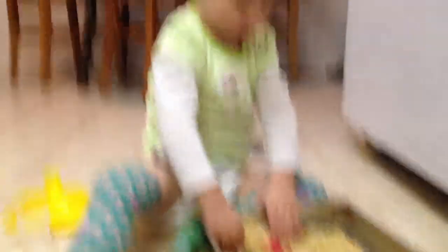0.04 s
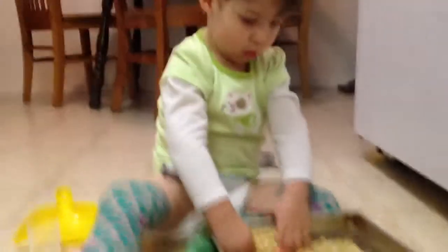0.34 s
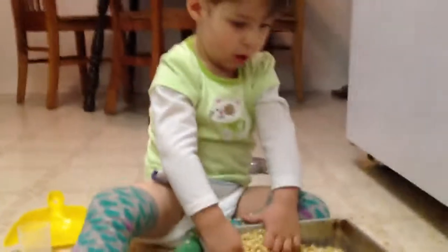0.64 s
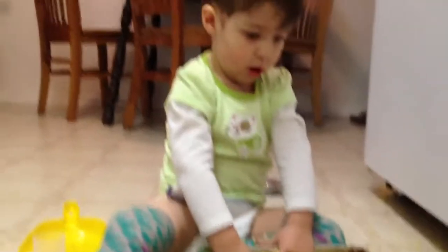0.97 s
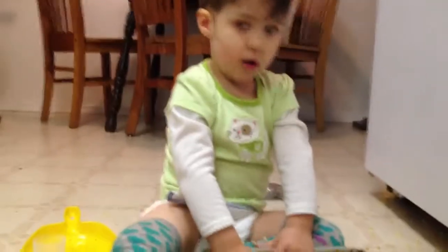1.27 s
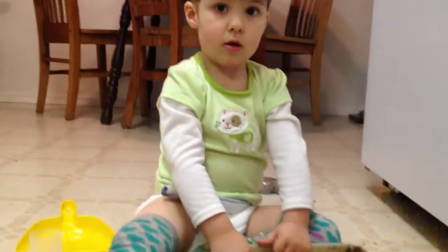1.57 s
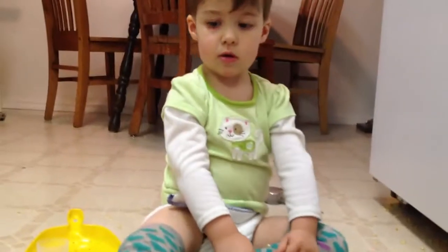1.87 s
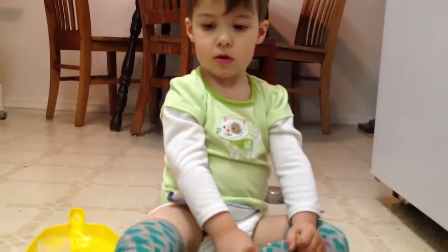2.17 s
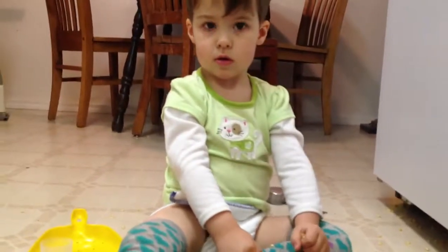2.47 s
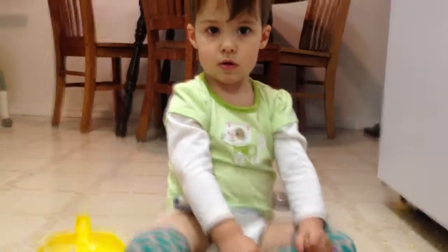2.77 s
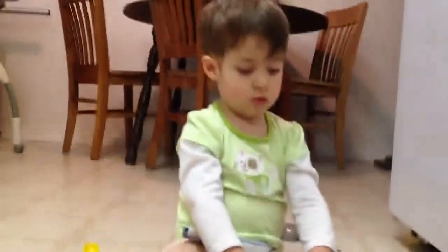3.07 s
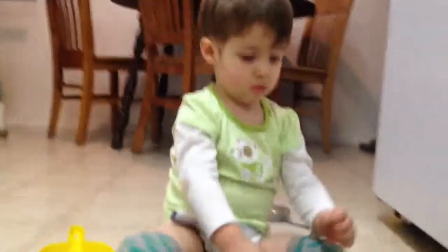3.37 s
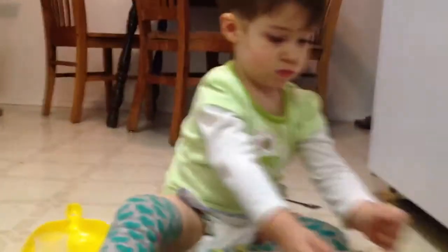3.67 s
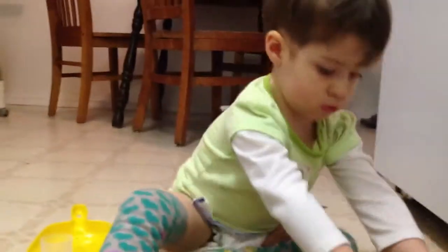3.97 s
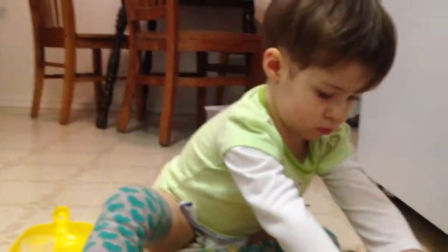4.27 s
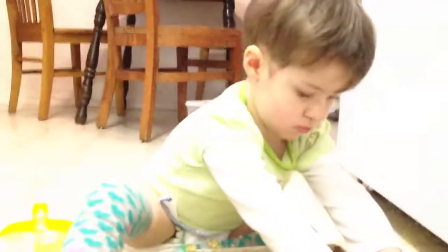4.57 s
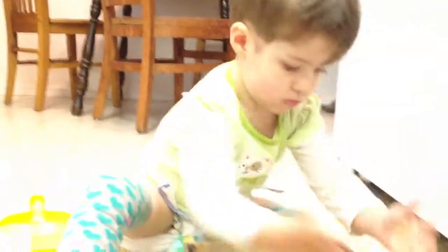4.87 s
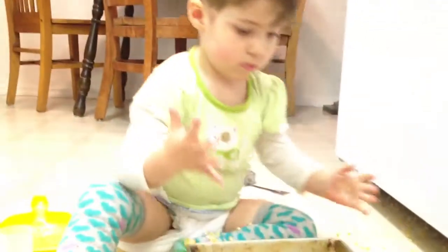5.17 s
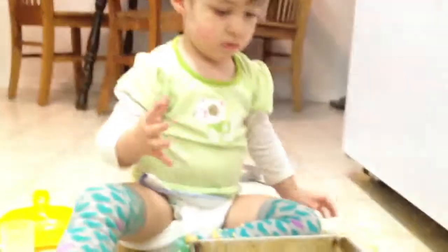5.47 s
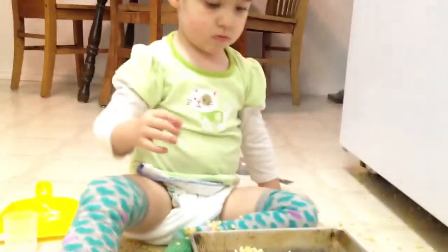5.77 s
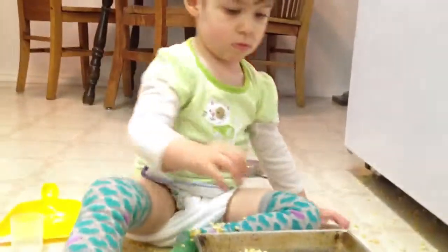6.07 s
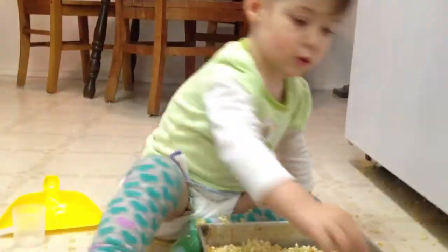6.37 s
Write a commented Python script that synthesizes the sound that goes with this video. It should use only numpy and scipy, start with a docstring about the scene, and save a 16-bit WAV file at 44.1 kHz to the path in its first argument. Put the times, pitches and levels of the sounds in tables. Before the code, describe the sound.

Dry kernels rattle and click in a metal baking pan, then pour back onto it after a lull, in a quiet kitchen.

```python
"""A metal baking tray on a kitchen floor, heard from close by through one small microphone.
An appliance chatters faintly in the hard-walled room throughout. For two seconds small hands stir dry
popcorn kernels: the pile rattles, the pushed pan booms softly, single kernels click on the sheet metal.
A lull follows, with a few dull bumps and scuffs. Near 3.8 s two fistfuls rain back in for about a
second, and a few more kernels shift and click up to the end."""
import sys
import numpy as np
from scipy import signal
from scipy.fft import rfft, irfft
from scipy.io import wavfile
from scipy.ndimage import uniform_filter1d

SR = 44100
rng = np.random.default_rng(int(sys.argv[2]) if len(sys.argv) > 2 else 0)


def waveform_to_disk(signal):
    """Save audio, clipped to [-1, 1], as 16-bit WAV at the path in sys.argv[1]."""
    frames = np.transpose(np.atleast_2d(signal))
    scaled = np.clip(frames, -1, 1) * 32767
    samples = np.round(scaled).astype(np.int16)
    wavfile.write(sys.argv[1], SR, samples)


N = 287973
TIME = np.arange(N) / SR
FREQ_HZ = np.fft.rfftfreq(N, 1 / SR)


def amp(db):
    """Decibels to gain."""
    return 10 ** (np.asarray(db) / 20)


def unit_rms(x):
    """Scales to an rms of one."""
    return x / np.sqrt(np.mean(x ** 2) + 1e-20)


def curve_at(points, hz):
    """Reads a table along a log-frequency axis."""
    freq_hz, value = np.transpose(points)
    return np.interp(np.log(hz + 1), np.log(freq_hz + 1), value)


def add(mix, start_s, sound):
    """Mixes a sound in at start_s."""
    part = mix[max(round(start_s * SR), 0):][:len(sound)]
    part += sound[:len(part)]


def colour(x, spectrum, size=2048):
    """Causal filter with the given spectrum, so that attacks stay sharp."""
    log_gain = np.log(amp(curve_at(spectrum, abs(np.fft.fftfreq(size, 1 / SR)))))
    taps = np.fft.ifft(np.exp(np.conj(signal.hilbert(log_gain)))).real
    return signal.fftconvolve(x, taps[:size // 2])[:len(x)]


def blend(x, ring_db, fizz_db):
    """Balances the pan's low ring and the husks' high fizz against the kernels' clack, at rms one."""
    hz, spectrum = np.fft.rfftfreq(len(x), 1 / SR), rfft(x)
    low = 1 / (1 + (hz / 3200) ** 10)
    high = 1 - 1 / (1 + (hz / 10000) ** 20)
    ring, clack, fizz = (unit_rms(irfft(spectrum * band, len(x))) for band in (low, 1 - low - high, high))
    return clack + amp(ring_db) * ring + amp(fizz_db) * fizz


def contact(t60_s, rise_s=.0008, size=3072):
    """One hard contact: a crowd of heavily damped modes, made as decaying noise, and its envelope."""
    t = np.arange(size) / SR
    envelope = (1 - np.exp(-t / rise_s)) * amp(-60 * t / t60_s)
    return envelope * rng.standard_normal(size), envelope / envelope.max()


# Room tone of the kitchen: freq_hz, relative_db
ROOM_SPECTRUM = [(30, -21), (70, -11), (130, -1.5), (230, 0), (400, -5.5), (800, -10.5), (1300, -11.5),
                 (3200, -18.5), (7500, -16.5), (10000, -27.5), (14000, -17), (15500, -27.5)]


def room_tone(level_db=-66.33):
    """Steady rumble and hiss all round the microphone."""
    spectrum = rfft(rng.standard_normal(N)) * amp(curve_at(ROOM_SPECTRUM, FREQ_HZ))
    return amp(level_db) * unit_rms(irfft(spectrum, N))


# Resonances of the appliance's loose panel, in the background: pitch_hz, width_hz, relative_db
PANEL_MODES = [(1950, 200, -5), (2230, 260, -1), (2630, 140, -6), (3950, 900, -12), (5850, 220, 1),
               (7200, 1800, -13)]
# Its slightly unsteady pace, about 14 beats a second: time_s, beat_count
PANEL_BEATS = [(0, 0), (2.392, 34), (3.245, 46), (3.62, 51), (5.61, 78), (6.11, 85), (6.54, 91)]


def appliance(level_db=-62, weak_db=-2.5):
    """A shaking motor makes a loose panel chatter twice a turn, strong then weak."""
    beat, phase = np.divmod(np.interp(TIME, *np.transpose(PANEL_BEATS)), 1)
    strength = amp(weak_db * (beat % 2) + rng.standard_normal(128)[beat.astype(int)])
    envelope = .1 + strength * np.minimum(phase / .1, 1) * amp(-14 * phase)
    power = sum(amp(db) ** 2 / (1 + (2 * (FREQ_HZ - hz) / width) ** 2) for hz, width, db in PANEL_MODES)
    chatter = irfft(rfft(envelope * rng.standard_normal(N)) * np.sqrt(power), N)
    return amp(level_db) * unit_rms(chatter)


def rattle(levels, spectrum, per_s, spread_db, clump_db, t60_s=.016, grain_count=80):
    """A clumpy hail of kernel contacts, mostly small. Rows of levels: time_s, clack_db, ring_db, fizz_db."""
    time_s, *columns = np.transpose(levels)
    t = TIME[(TIME >= time_s[0]) & (TIME <= time_s[-1])]
    clack_db, ring_db, fizz_db = (np.interp(t, time_s, column) for column in columns)
    chance, size, kind = rng.random((3, N))[:, :len(t)]
    clumps = unit_rms(uniform_filter1d(rng.standard_normal(N), size=500))[:len(t)]  # the pile gives way
    hit_db = spread_db * np.minimum(-np.log(size + 1e-9), 4) + clump_db * clumps
    hits = (chance < per_s / SR) * amp(hit_db)
    hits /= np.sqrt(abs(uniform_filter1d(hits ** 2, size=3000)) + 1e-4)  # evens out slow swings
    grains, out = np.zeros(len(t)), np.zeros(N)
    for k in range(grain_count):
        own_hits = hits * ((kind * grain_count).astype(int) == k)
        grains += signal.oaconvolve(own_hits, unit_rms(contact(t60_s)[0]))[:len(t)]
    sound = amp(clack_db) * blend(colour(grains, spectrum), ring_db - clack_db, fizz_db - clack_db)
    add(out, time_s[0], sound * signal.windows.tukey(len(t), min(300 / len(t), 1)))
    return out


# Band in which the bare bottom of the pan rings: low_hz, high_hz
BOTTOM_BAND = [1930, 2420]


def pan_bottom(drive):
    """The broad ring of the pan's bottom, as strong as the rattle that drives it."""
    band = signal.butter(2, BOTTOM_BAND, "bandpass", fs=SR, output="sos")
    return np.std(drive) * unit_rms(signal.sosfilt(band, drive))


# Hands through the pile, the last strokes scooping two fistfuls: start_s, end_s, clack_db, ring_db, fizz_db
HAND_STROKES = [(0, 0.059, -27, -35, -31), (0.14, .18, -33.5, -38, -40), (0.26, 0.428, -31.5, -38, -37.5),
                (0.586, 0.835, -35, -41.5, -43), (0.893, 0.972, -46, -48.5, -60),
                (1.03, 1.193, -43, -46.5, -48), (1.34, 1.44, -44.5, -51, -56),
                (1.517, 1.547, -34.5, -42.5, -36.5), (1.637, 1.928, -32, -43, -34.5)]


def stir_levels(rise_db_per_s=123, fall_db_per_s=147, fizz_haste=2.1, stop_s=2.14):
    """Level rows for the rattle: each stroke builds up, holds and dies away, the fizz fastest."""
    t, power = np.linspace(0, stop_s, 215), 0
    for start_s, end_s, *held_db in HAND_STROKES:
        drop_db = np.maximum(rise_db_per_s * (start_s - t), fall_db_per_s * (t - end_s)).clip(min=0)
        power = power + amp(np.array(held_db) - np.outer(drop_db, [1, 1, fizz_haste])) ** 2
    return np.column_stack([t, 10 * np.log10(power + 1e-12)])


# Kernel on kernel, close up: freq_hz, relative_db
PILE_SPECTRUM = [(60, -36), (250, -25.5), (700, -28), (1200, -17), (1700, -13.5), (2200, -7.5),
                 (2750, -12.5), (3200, -7.5), (4100, 1.5), (5600, 4), (7300, 8), (9000, 3), (11000, -6.5),
                 (15000, -9)]
# Ring from kernels dragged over the bare bottom: time_s, relative_db
BOTTOM_DRAG = [(0, -14), (.17, 0.5), (.25, -30), (.75, -46), (1.15, -6), (1.5, -11), (2.1, -15)]


def stir(gain_db=-1, drag_db=-9.5, waver_db=3):
    """Stirring grinds many kernels together and rings the pan's bottom; that ring comes and goes."""
    grind = rattle(stir_levels(), PILE_SPECTRUM, per_s=3400, spread_db=3.0, clump_db=1.52)
    waver = unit_rms(uniform_filter1d(rng.standard_normal(N), size=1800))
    bottom_db = np.interp(TIME, *np.transpose(BOTTOM_DRAG)) + waver_db * waver + drag_db
    return amp(gain_db) * (grind + amp(bottom_db) * pan_bottom(grind))


def finger_crackle(per_s=100, gain_db=7, spread_db=6, highpass_hz=6000, cap_db=-38):
    """Kernels pinched between the fingers slip with tiny bright ticks, clearest in light handling."""
    time_s, push_db = stir_levels().T[:2]
    chance, size = rng.random(N), rng.standard_normal(N)
    tick_db = np.minimum(np.interp(TIME, time_s, push_db), cap_db) + gain_db + spread_db * size
    out = np.zeros(N)
    for i in np.flatnonzero((chance < per_s / SR) & (TIME < time_s[-1])):
        add(out, TIME[i], amp(tick_db[i]) * contact(t60_s=.0078, rise_s=.00013)[0])
    return signal.sosfilt(signal.butter(3, highpass_hz, "highpass", fs=SR, output="sos"), out)


# Low modes of the loaded pan on the floor: pitch_hz, relative_db, t60_s
PAN_MODES = [(95, -22, 0.32), (151.6, -5, 0.22), (211.7, -8, 0.18), (283, -6.5, .08), (416, -5.5, 0.12),
             (465, -2, 0.059), (551, -5, 0.082), (835, -9.5, .2)]
# Pushes and blows that flex it: start_s, relative_db
PAN_PUSHES = [(0.074, -38), (0.168, -35.5), (0.273, -35), (0.329, -37), (0.384, -41), (3.809, -41),
              (3.853, -46), (4.023, -48)]


def pan_boom(gain_db=-8, rise_s=.0022):
    """The pan flexes in its low modes, in a mix that depends on where the metal is touched."""
    out, t = np.zeros(N), np.arange(SR // 2) / SR
    modes = [amp(db - 60 * t / t60_s) * np.sin(2 * np.pi * hz * t) for hz, db, t60_s in PAN_MODES]
    attack = 1 - np.exp(-t / rise_s)
    for start_s, db in PAN_PUSHES:
        weights = rng.uniform(0.52, 1.32, len(modes)) * rng.choice([-1, 1], len(modes))
        add(out, start_s, amp(db + gain_db) * attack * (weights @ modes))
    return out


# Dull bumps and scuffs, faint at the microphone: start_s, level_db, pitch_hz, length_s
SOFT_CONTACTS = [(0.1, -43, 238, 0.0086), (.388, -46, 150, 0.023), (2.267, -56.5, 1360, 0.045),
                 (2.725, -50, 1150, 0.0044), (2.805, -54.5, 348, 0.018), (2.814, -53, 1310, 0.035),
                 (2.828, -43.5, 338, 0.015), (2.831, -48, 203, 0.021), (3.189, -52, 155, 0.018),
                 (3.806, -49.5, 258, 0.0055), (3.85, -49, 170, 0.011), (5.366, -54, 2410, 0.049),
                 (6.279, -50.5, 2180, 0.013), (6.385, -47.5, 3530, 0.027), (6.44, -53, 1300, 0.036)]


def bumps(band_ratio=1.47, size=4096):
    """Soft contacts without a ring: a short puff of noise round one pitch."""
    out, t = np.zeros(N), np.arange(size) / SR
    for start_s, db, hz, length_s in SOFT_CONTACTS:
        envelope = np.sin(np.pi * np.minimum(t / length_s, 1))
        band = signal.butter(3, [hz / band_ratio, hz * band_ratio], "bandpass", fs=SR, output="sos")
        puff = signal.sosfilt(band, envelope * rng.standard_normal(size))
        add(out, start_s, amp(db) * np.sqrt(np.mean(envelope ** 2)) * unit_rms(puff))
    return out


def strays(levels, per_s, over_db, ring_db=-18, fizz_db=-12, spread_db=2.5):
    """Strike rows for kernels that jump out of a moving pile at random, as strongly as it moves."""
    time_s, clack_db = levels.T[:2]
    gap, size, ring, fizz = rng.uniform(-1, 1, (40, 4)).T
    start_s = time_s[0] + np.cumsum(1 + gap) / per_s
    db = np.interp(start_s, time_s, clack_db) + over_db + spread_db * size
    rows = np.transpose([start_s, db, ring_db + 2 * spread_db * ring, fizz_db + 2 * spread_db * fizz])
    return list(rows[start_s < time_s[-1]])


# Kernel on sheet metal, close up: freq_hz, relative_db
STRIKE_SPECTRUM = [(60, -48), (250, -42), (650, -27.5), (1200, -12), (1700, -8), (2350, -3.5), (3100, -6.5),
                   (4200, 0.5), (5600, 2), (7300, 10.5), (9000, 1.5), (11000, -15), (14000, -10.5),
                   (15500, -18)]
# Kernels that strike clear of the rattle: start_s, relative_db, ring_share_db, fizz_share_db
KERNEL_STRIKES = [(.118, -12.5, -15, -19), (.133, -17, -22, -8), (0.2736, -10, -17.5, -9.5),
                  (0.5518, -17.5, -22, -26), (.647, -16.5, -26, -21), (.689, -14.5, -29, -15),
                  (.8876, -22, -31, -12), (1.0041, -14.5, -21, -15), (1.027, -17.5, -30, -6.5),
                  (1.039, -25, -20, -2), (1.0726, -20, -22, -11), (1.152, -19.5, -15, -15),
                  (1.192, -24, -10.5, -20), (1.258, -26, -16, -12), (1.312, -24.5, -17.5, -8),
                  (1.333, -18.5, -25, -13), (1.36, -24, -25, -3.5), (1.472, -25, -12, -7),
                  (1.525, -16, -25, -7), (1.766, -13.5, -23, -10.5), (1.782, -14, -24, -10),
                  (1.8115, -12.5, -20, -15), (1.86, -17.5, -17, -13), (1.983, -20, -17, -13),
                  (2.054, -23, -17, -31), (2.067, -28, -22, -10.5), (2.267, -35, -7, -20),
                  (2.891, -25.5, -28, -15.5), (3.108, -36.5, -13.5, -23), (3.655, -21, -15.5, -13),
                  (3.701, -27, -17, -14), (3.736, -24.5, -8.5, -16), (3.809, -4, -19, -8),
                  (3.814, -7, -17, -7), (3.855, -2, -18.5, -12.5), (3.898, -10, -16, -10),
                  (3.937, -13, -12, -11), (3.972, -5, -18.5, -11), (3.987, -17, -15, -12),
                  (4.0259, -9.5, -19, -8), (4.032, -8.5, -20, -11), (4.16, -19.5, -28, -1.5),
                  (4.2213, -14, -15.5, -8.5), (4.276, -20.5, -10, -15), (4.301, -21, -18, -14),
                  (4.336, -11.5, -22, -17), (4.341, -10.5, -18.5, -14), (4.351, -19, -20, -6),
                  (4.382, -18.5, -14, -7), (4.416, -17, -33, -12), (4.438, -16.5, -14, -15),
                  (4.462, -18.5, -25, -8), (4.494, -19.5, -8, -8.5), (4.54, -18.5, -10, -12),
                  (4.608, -17, -11.5, -13.5), (4.746, -19, -12, -18), (4.752, -23.5, -12, -13),
                  (4.7686, -24.5, -13, -20), (4.818, -34, -4, -27), (4.865, -34.5, -23, -20),
                  (5.129, -38, -16, -18), (5.149, -34, -16, -15), (5.2066, -44.5, -25, -11),
                  (5.389, -34.5, -26, -16), (5.398, -36.5, -24, -18), (5.441, -34.5, -24, -16),
                  (5.518, -31, -23, -8.5), (6.164, -33.5, -24, -12), (6.193, -36.5, -34, -2.5),
                  (6.311, -32, -13, -26), (6.445, -32.5, -8.5, -17), (6.4871, -20.5, -17.5, -16),
                  (6.501, -23, -13, -18), (6.505, -7.5, -18.5, -12.5), (6.52, -23, -10, -21)]


def kernel_clicks(gain_db=-10.5, ring_lift_db=8, fizz_lift_db=9):
    """Single kernels hit the pan or the floor, each ringing in its own way."""
    out = np.zeros(N)
    stirred = strays(stir_levels(), per_s=14, over_db=10)
    poured = strays(pour_levels(), per_s=15, over_db=6.5)
    for start_s, db, ring_db, fizz_db in KERNEL_STRIKES + stirred + poured:
        burst, envelope = contact(t60_s=.018, rise_s=.0016)
        click = blend(colour(burst, STRIKE_SPECTRUM), ring_db + ring_lift_db, fizz_db + fizz_lift_db)
        add(out, start_s, amp(db + gain_db) * np.sqrt(np.mean(envelope ** 2)) * click)
    return out


# A wash behind the clicks before the pour, then small shifts of kernels to the end:
# start_s, end_s, final_relative_db
FAINT_SWELLS = [(3.648, 3.77, -54.5), (4.642, 4.71, -39), (5.081, 5.17, -63), (5.32, 5.415, -53.5),
                (6.269, 6.53, -51)]


def faint_rattles(gain_db=-1.5, swell_db=17, ring_db=-2.5, fizz_db=-15, bottom_db=-7):
    """Each faint rattle swells to its end and rings the pan's bottom."""
    swells = np.zeros(N)
    for start_s, end_s, db in FAINT_SWELLS:
        final_db = db + np.array([0, ring_db, fizz_db])
        levels = [(start_s, *(final_db - swell_db)), (end_s, *final_db)]
        swells += rattle(levels, PILE_SPECTRUM, per_s=1700, spread_db=3.5, clump_db=0.5)
    return amp(gain_db) * (swells + amp(bottom_db) * pan_bottom(swells))


def pour_levels(start_s=3.825, peak_s=4.05, empty_s=4.77, stop_s=4.89,
                swell_db_per_s=45, drain_db_per_s=40.5, stop_db_per_s=170):
    """Level rows for the rattle: it swells as the fists open, thins as they drain, stops once empty."""
    t = np.linspace(start_s, stop_s, 100)
    peak_db, follows_flow = [-22.5, -32.5, -24.5], [1, 0.61, 1.23]  # clack, ring, fizz
    flow_db = np.minimum(swell_db_per_s * (t - peak_s), drain_db_per_s * (peak_s - t))
    cutoff_db = stop_db_per_s * np.maximum(t - empty_s, 0)
    return np.column_stack([t, np.outer(flow_db, follows_flow) + peak_db - cutoff_db[:, None]])


def pour(gain_db=-4):
    """Two fistfuls of kernels rain back onto the sheet metal."""
    return amp(gain_db) * rattle(pour_levels(), STRIKE_SPECTRUM, per_s=2000, spread_db=3.5, clump_db=1.0)


# Reverberation of the hard-walled kitchen, longest in the mids: freq_hz, t60_s
KITCHEN_DECAY = [(200, 0.13), (2000, 0.38), (7000, 0.2), (15000, 0.2)]


def kitchen_reflections(source, gap_s=.005, per_s=4000, tail_count=3):
    """Dense echoes off floor, cupboards and walls; three tails crossfade steadily so no pitch lingers."""
    out = np.zeros(N)
    for k in range(tail_count):
        echoes = rng.standard_normal(SR) * (rng.random(SR) < per_s / SR) * (TIME[:SR] > gap_s)
        hz, t, spectra = signal.stft(echoes, SR, nperseg=128)
        decay = amp(-60 * t / curve_at(KITCHEN_DECAY, hz)[:, None])
        tail = signal.istft(spectra * decay, SR, nperseg=128)[1]
        share = np.sqrt(2 / tail_count) * np.cos(np.pi * (10 * TIME + k / tail_count))  # powers sum to one
        out += signal.fftconvolve(source * share, tail / np.linalg.norm(tail))[:N]
    return out


def scene(reflections_db=-8):
    """What reaches the microphone, in mono: the tray up close, the kitchen behind it."""
    tray = stir() + finger_crackle() + pan_boom() + kernel_clicks() + faint_rattles() + pour()
    room = amp(reflections_db) * kitchen_reflections(tray) + room_tone() + appliance()
    return (tray + bumps() + room)[None]


def record(dry, notch_hz=5150, notch_width_hz=260, notch_db=-9, bass_hz=62, top_hz=15420):
    """The small microphone has one narrow dip from its port and loses the deep bass and the very top."""
    dip = amp(notch_db * np.exp(-((FREQ_HZ - notch_hz) / notch_width_hz) ** 2))
    bass_cut = signal.butter(2, bass_hz, "highpass", fs=SR, output="sos")
    top_cut = signal.firwin(301, top_hz, window=("kaiser", 9), fs=SR)
    heard = signal.sosfilt(bass_cut, irfft(rfft(dry) * dip, N))
    return signal.oaconvolve(heard, top_cut[None], "same")


dry = scene()
out = record(dry)
waveform_to_disk(out)
```